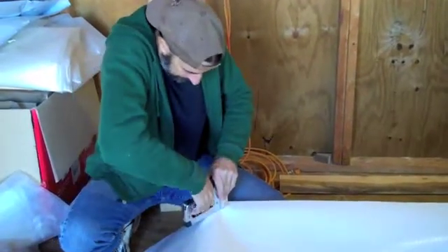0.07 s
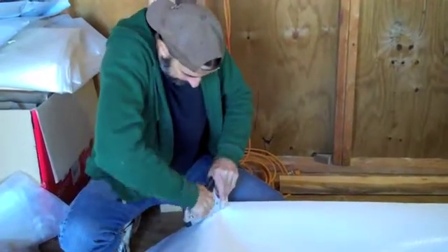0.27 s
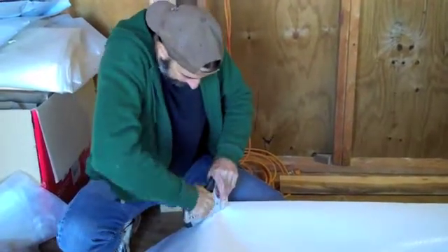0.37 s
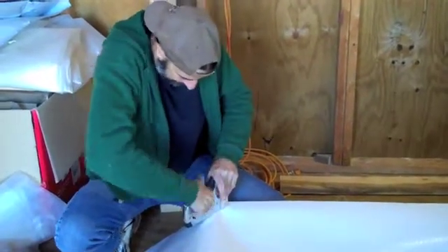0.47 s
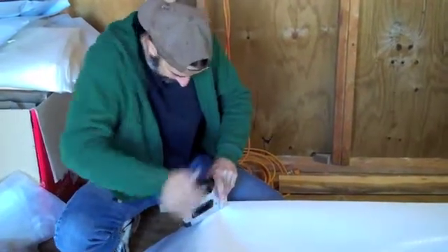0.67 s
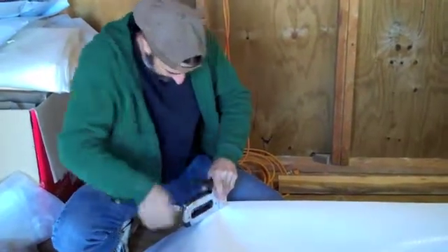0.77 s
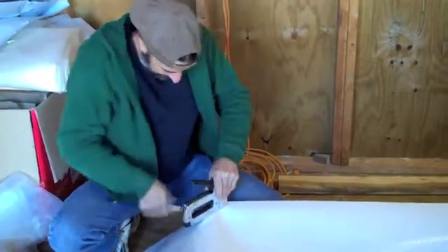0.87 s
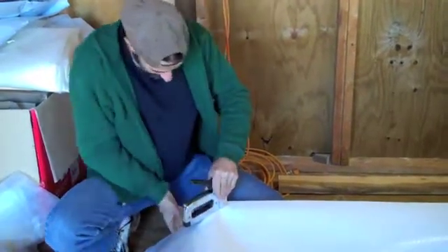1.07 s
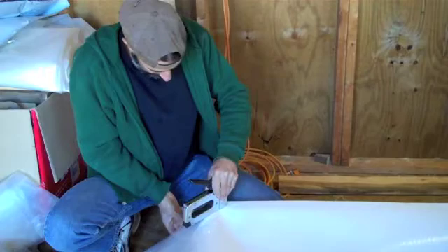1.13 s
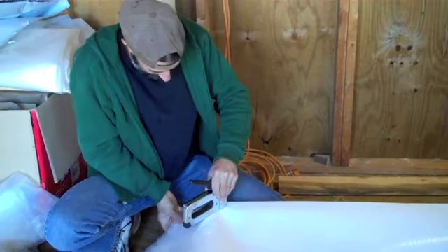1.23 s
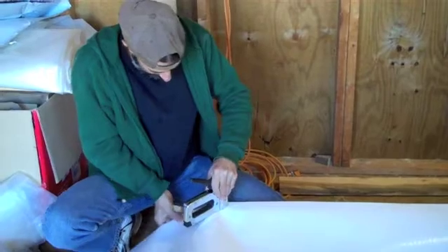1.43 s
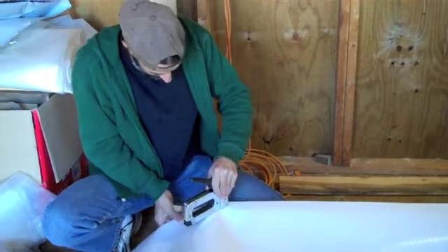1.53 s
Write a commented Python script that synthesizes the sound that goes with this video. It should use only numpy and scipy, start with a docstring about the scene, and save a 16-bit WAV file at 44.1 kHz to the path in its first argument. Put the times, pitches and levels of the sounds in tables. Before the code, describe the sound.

Loud single staple gun shot through plastic sheeting, then the lever clacks back and sheeting rustles

```python
"""Staple gun in a wooden shed

A hand staple gun fires once through plastic sheeting into wood, in a small wooden shed, over quiet air.
The lever creaks and its catch slips: noise bursts and tiny friction slips coloured by narrow resonances.
The driver slams home in three bursts, ringing steel and boards and overloading the microphone.
The lever scrapes back to its stop and rings; then a hand brushes over the sheeting, which squeaks
faintly, and settles on the floor. Bursts and rubbing each get a decaying noise tail from the shed."""
import sys
import numpy as np
from scipy import signal
from scipy.fft import irfft
from scipy.io import wavfile

SR = 44100
rng = np.random.default_rng(int(sys.argv[2]) if len(sys.argv) > 2 else 0)


def wav_out(sig):
    """Save sig, one row per channel (or a flat mono array), as 16-bit PCM at SR to the path in sys.argv[1]."""
    wavfile.write(sys.argv[1], SR, np.round(np.clip(np.atleast_2d(sig).T, -1, 1) * 32767).astype(np.int16))


N = 70560
T = np.arange(N) / SR  # seconds
HZ = np.fft.rfftfreq(N, 1 / SR)
SHED_RISE_S = 0.011  # build-up time of the shed's reflections

# How alike the two microphones hear a sound. Each row: frequency in Hz, likeness (1 = same, clipped there).
MIC_LIKENESS = [(40, 1.1), (150, .98), (300, 1.03), (700, 0.96), (2500, 0.42), (5500, .5), (9000, .2),
                (14000, 0.86)]
# Stereo balance of the pair. Each row: frequency in Hz, left minus right in dB.
MIC_BALANCE = [(200, -1.5), (700, 0.5), (1300, -1.5), (3000, 0.5), (5600, -6.5), (7300, 7.5), (9000, 15.5),
               (13000, 10.5)]


def amp(db):
    """Decibels to gain."""
    return 10 ** (np.asarray(db) / 20)


def unit(x):
    """Scales to rms 1."""
    return x / np.sqrt(np.mean(x ** 2) + 1e-20)


def read(points, hz):
    """Reads a table on a log-frequency axis."""
    f, value = np.transpose(points)
    return np.interp(np.log(hz + 1), np.log(f), value)


def at(s, sound):
    """Delays a sound to its start time in seconds."""
    delay = max(round(s * SR), 0)
    return np.pad(sound, ((0, 0), (delay, 0)))[:, :N]


def pan(db):
    """Left and right gains of constant power."""
    gains = amp(np.array([db, -db]) / 2)
    return gains / np.sqrt(np.mean(gains ** 2, axis=0))


def noise(gain, balance=MIC_BALANCE, likeness=MIC_LIKENESS):
    """Coloured noise as the two microphones hear it: partly shared, partly independent in each band."""
    a, b = np.exp(2j * np.pi * rng.random((2, len(HZ))))
    same = np.clip(read(likeness, HZ), -1, 1)
    pair = np.array([a, same * a + np.sqrt(1 - same ** 2) * b])
    return unit(irfft(pair * gain * pan(read(balance, HZ)), N))


def peak(hz, width):
    """Gain of one steep resonance, down to half at width / 2 either side."""
    return 1 / (1 + (2 * (HZ - hz) / width) ** 2)


def die_away(x):
    """The shed's tail: builds quickly, then each band fades at its own rate."""
    # Reverberation of the shed. Each row: frequency in Hz, time to fall 60 dB in seconds.
    fade_times = [(60, 0.23), (250, 0.65), (700, .52), (2000, .5), (4000, 0.42), (7500, 0.33), (9500, 0.27),
                  (14000, .2)]
    hz, t, bands = signal.stft(x, SR, nperseg=256)
    fade = amp(-60 * t / read(fade_times, hz)[:, None])
    tail = signal.istft(bands * fade, SR, nperseg=256)[1][:, :N]
    return tail * (1 - np.exp(-T / SHED_RISE_S))


def waver():
    """Slow random swing of a mode's strength and phase, from reflections."""
    depth, swing_hz = 1, 25
    spectrum = np.exp(2j * np.pi * rng.random(len(HZ))) * np.exp(-(HZ / swing_hz) ** 2)
    swing = np.fft.ifft(spectrum, N)
    return (1 + depth * swing / np.std(swing)) / np.hypot(1, depth)


def ring(modes):
    """Struck modes fade exponentially, each reaching the microphones with its own phase lag."""
    out = np.zeros((2, N))
    for (hz, db, t60), (turn, side) in zip(modes, rng.random((len(modes), 2))):
        lag = np.arccos(np.clip(read(MIC_LIKENESS, hz), -1, 1)) * np.sign(side - .5)
        wave = waver() * np.exp(2j * np.pi * (hz * T + turn) - np.log(1000) * T / t60)
        sides = pan(read(MIC_BALANCE, hz)) * [1, np.exp(1j * lag)]
        out += amp(db) * np.outer(sides, wave).real
    return out / np.sqrt(sum(amp(db) ** 2 for _, db, _ in modes) / 2)


def blow(s, level_db, decay_s, gain, room_db):
    """A short burst of contact noise and the shed's answer."""
    burst = noise(gain) * np.exp(-T / decay_s)
    tail = die_away(noise(gain))
    return at(s, amp(level_db) * (burst + amp(room_db) * tail))


def rub(levels, gain):
    """Tiny random slips under a level curve, coloured by the surface and the shed."""
    slips_per_s, spread_db = 3700, 4.5
    early_s, room_db = 0.0088, -5
    hits = (rng.random(N) < slips_per_s / SR) * rng.choice([-1, 1], N)
    slips = hits * amp(spread_db * np.minimum(rng.exponential(1, N), 4))
    drive = unit(slips) * amp(np.interp(T, *np.transpose(levels)))
    direct = noise(gain) * np.exp(-T / early_s)
    tail = die_away(noise(gain))
    response = unit(unit(direct) + amp(room_db) * unit(tail)) / np.sqrt(N)
    return signal.fftconvolve(drive[None], response, axes=1)[:, :N]


def quiet_air():
    """Steady coloured noise: the air of the shed, spread wider across the pair than the other sounds."""
    # Colour of the air. Each row: frequency in Hz, relative level in dB.
    air_colour = [(25, -11.5), (70, -7.5), (150, -3.5), (260, -6), (400, -10), (650, -10.5), (1500, -16),
                  (3500, -17.5), (6000, -14), (7700, -16), (9500, -20.5), (14000, -22.5)]
    # Stereo balance of the air. Each row: frequency in Hz, left minus right in dB.
    air_balance = [(60, 0.5), (1000, 4.5), (5000, -0.5), (7500, 4.5), (10000, 1)]
    # Likeness of the air at the two microphones. Each row: frequency in Hz, likeness (1 = same).
    air_likeness = [(60, 0.31), (130, .8), (280, 0.48), (610, .4), (1500, .15), (10000, 0)]
    level_db = -58.5
    return amp(level_db) * noise(amp(read(air_colour, HZ)), air_balance, air_likeness)


def sheeting():
    """A hand rustles over the plastic by many small slips, with a faint rough squeak that rises."""
    # Hand brushing the sheeting. Each row: time in seconds, level in dB.
    brush_levels = [(0, -60), (.1, -61.5), (.2, -51.5), (.6, -72.5), (.88, -66.5), (.97, -57), (1.08, -57),
                    (1.1, -60.5), (1.125, -51), (1.15, -57), (1.2, -49.5), (1.24, -57), (1.3, -68),
                    (1.6, -75.5)]
    # Colour of the rustle. Each row: frequency in Hz, relative level in dB.
    rustle_colour = [(60, -25), (200, -2.5), (600, -1), (1200, -2), (1900, -3), (2700, -3), (4500, -6),
                     (7500, -3.5), (9500, -20.5), (14000, -23.5)]
    # Squeak as the hand drags. Each row: time in seconds, level in dB, pitch in Hz.
    squeak_path = [(.9, -86.5, 1300), (1, -69, 1400), (1.06, -57.5, 1818), (1.13, -67, 1942),
                   (1.17, -65, 1986), (1.22, -58, 2150), (1.28, -85, 2193)]
    squeak_width_hz = 330
    s, db, hz = np.transpose(squeak_path)
    # a noise band at the mean pitch, shifted along the pitch curve
    band = signal.hilbert(noise(peak(np.mean(hz), squeak_width_hz)))
    glide = np.exp(2j * np.pi * np.cumsum(np.interp(T, s, hz) - np.mean(hz)) / SR)
    squeak = amp(np.interp(T, s, db)) * (band * glide).real
    return rub(brush_levels, amp(read(rustle_colour, HZ))) + squeak


def floorboards():
    """The shot sets the boards ringing; knocks and soft thuds follow as noise bursts."""
    # Dull knocks, lever at its stop and hand landing.
    # Each row: start in seconds, level in dB, burst decay in seconds.
    knock_times = [(0.5138, -33, 0.0082), (1.2032, -51.5, 0.0023), (1.215, -53, .006)]
    # Soft thuds of hand and tool on the floor. Each row: start in seconds, level in dB, burst decay in seconds.
    thud_times = [(.545, -46.5, 0.044), (1.224, -49, 0.046)]
    # Colours of knock and thud. Each row: frequency in Hz, relative level in dB.
    knock_colour = [(40, -10), (250, 7.5), (700, 3.5), (900, 2.5), (1120, 2), (1500, -1), (2150, 0.5),
                    (2700, 0), (4000, -7), (8000, -16), (10000, -32), (14000, -17)]
    thud_colour = [(40, -22), (90, -12), (140, 1), (260, 2), (420, -8), (700, -10), (1500, -24),
                   (5000, -62)]
    # Modes of the boards. Each row: frequency in Hz, relative level in dB, time to fall 60 dB in seconds.
    board_modes = [(64, -22, 0.37), (82, -21, 0.34), (131.6, -6, 0.46), (160, -1, 0.4), (196, -6.5, 0.63),
                   (234.9, 0.5, .34), (249.8, 4.5, 0.35), (276, -1, .34), (308.8, -6, 0.35),
                   (426, -4, 0.39), (522, -4.5, 0.52), (729, -9, .4), (992, -0.5, 0.25)]
    room_db = -6.5
    thump_s, thump_db, thump_rise_s = .246, -17, .006
    hard, soft = amp(read(knock_colour, HZ)), amp(read(thud_colour, HZ))
    knocks = sum(blow(s, db, decay_s, hard, room_db) for s, db, decay_s in knock_times)
    thuds = sum(blow(s, db, decay_s, soft, room_db) for s, db, decay_s in thud_times)
    thump = amp(thump_db) * (1 - np.exp(-T / thump_rise_s)) * ring(board_modes)
    return knocks + thuds + at(thump_s, thump)


def lever():
    """The steel lever clicks, scrapes through its narrow resonances and rings at its stop."""
    # Clicks of lever and catch. Each row: start in seconds, level in dB, burst decay in seconds.
    click_times = [(0.0148, -44, 0.0026), (0.2078, -33, 0.012), (.2210, -10.5, 0.004),
                   (.229, -13.5, 0.0014), (0.4687, -25, 0.0024), (0.4885, -43, 0.0039),
                   (0.502, -29.5, 0.0014), (.513, -24, 0.0052)]
    # Colour of a plain click. Each row: frequency in Hz, relative level in dB.
    click_colour = [(100, -23), (1000, -14), (2400, -8), (4200, -5), (5700, -1.5), (8000, -3), (9500, -11),
                    (14000, -23)]
    # Friction as the lever is pressed and let go. Each row: time in seconds, level in dB.
    slide_levels = [(0, -37), (.018, -53.5), (.03, -66), (.15, -56), (.204, -55), (.22, -80.5), (.464, -76),
                    (.47, -31.5), (.512, -30.5), (.525, -61), (.6, -76)]
    # Resonances of the sliding lever. Each row: frequency in Hz, width in Hz, relative level in dB.
    resonances = [(5070, 120, -1), (5770, 340, 0.5), (5620, 89, -10), (7600, 500, -4)]
    # Modes of the lever on its stop. Each row: frequency in Hz, relative level in dB, time to fall 60 dB in seconds.
    stop_modes = [(302, -8.5, 0.48), (414, -17, 0.17), (695, -8.5, 0.5), (1140, -0.5, 0.12),
                  (2250, 9, 0.046), (2220, 4, 0.11)]
    click_ring_db, scrape_ring_db, room_db = -6, -0.5, -8.5
    stop_s, stop_db = .5135, -30
    plain = unit(amp(read(click_colour, HZ)))
    peaks = unit(sum(amp(db) * peak(hz, width) for hz, width, db in resonances))
    click = np.hypot(plain, amp(click_ring_db) * peaks)
    scrape = np.hypot(plain, amp(scrape_ring_db) * peaks)
    clicks = sum(blow(s, db, decay_s, click, room_db) for s, db, decay_s in click_times)
    return clicks + rub(slide_levels, scrape) + at(stop_s, amp(stop_db) * ring(stop_modes))


def shot():
    """The spring drives the staple in a few hard contacts; near walls answer and the steel rings."""
    # Driver striking, staple sinking. Each row: start in seconds, level in dB, burst decay in seconds.
    contacts = [(0.2392, -1, 0.004), (0.2442, -3, 0.012), (0.2476, -0.5, 0.0055)]
    # Colour of the contacts. Each row: frequency in Hz, relative level in dB.
    shot_colour = [(30, -15), (100, -18.5), (300, -10.5), (420, -11), (1000, -2.5), (1350, -10.5),
                   (1520, -4.5), (2300, -3), (3000, 0), (3500, -2.5), (5200, 0.5), (7800, -0.5),
                   (9500, -12), (14000, -19.5)]
    # Modes of steel frame and spring. Each row: frequency in Hz, relative level in dB, time to fall 60 dB in seconds.
    steel_modes = [(1485, -7.5, .22), (1553, -7.5, 0.34), (2450, -3.5, 0.2), (2755, -2.5, 0.11),
                   (3040, -0.5, 0.28), (3060, -7, 0.41), (3243, -2, .33), (4960, -1.5, .18),
                   (4870, -2, .22), (5112, 2.5, 0.085), (6160, 2.5, .08), (5944, 11.5, .07),
                   (7030, 12, 0.039)]
    room_db, early_db, early_s = -17, -8.5, 0.022
    steel_s, steel_db = .2445, -6.5
    gain, out = amp(read(shot_colour, HZ)), 0
    for s, db, decay_s in contacts:
        walls = noise(gain) * np.exp(-T / early_s) * (1 - np.exp(-T / SHED_RISE_S))
        out = out + blow(s, db, decay_s, gain, room_db) + at(s, amp(db + early_db) * walls)
    return out + at(steel_s, amp(steel_db) * ring(steel_modes))


def scene():
    """Quiet air, rustling sheeting, floor and staple gun together."""
    return quiet_air() + sheeting() + floorboards() + lever() + shot()


def record(dry):
    """The microphone overloads unevenly on the shot, which adds a low push; then the band limit."""
    headroom, knee, lopsided = 1, 7.3, .1
    edge_hz = 14250
    held = dry / (1 + abs(dry / headroom) ** knee) ** (1 / knee)
    held = held - lopsided * held ** 4  # the even power pushes both half-waves downward
    low_pass = signal.firwin(255, edge_hz, window=("kaiser", 8), fs=SR)
    return signal.oaconvolve(held, low_pass[None], "same")


dry = scene()
out = record(dry)
wav_out(out)
```